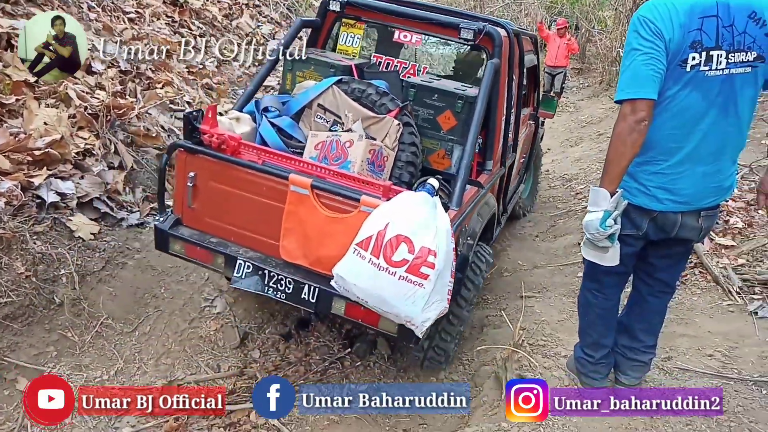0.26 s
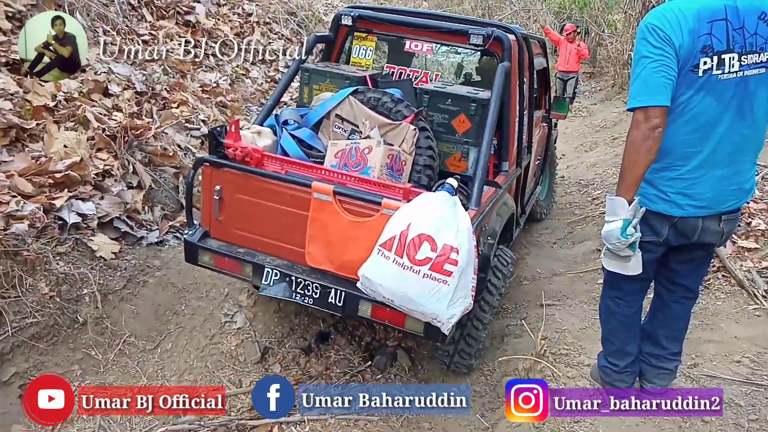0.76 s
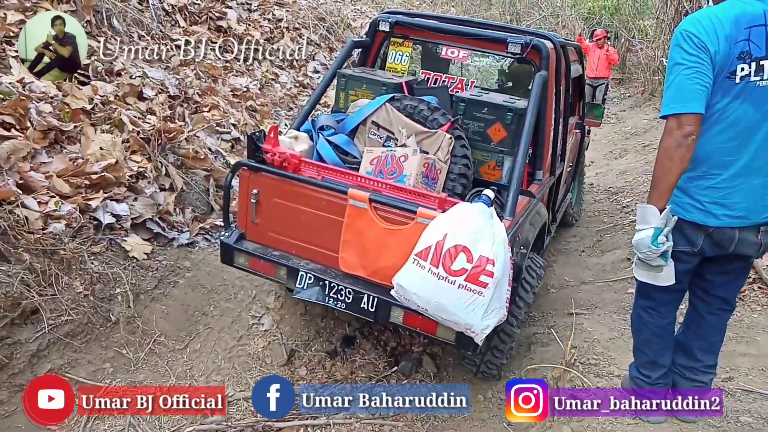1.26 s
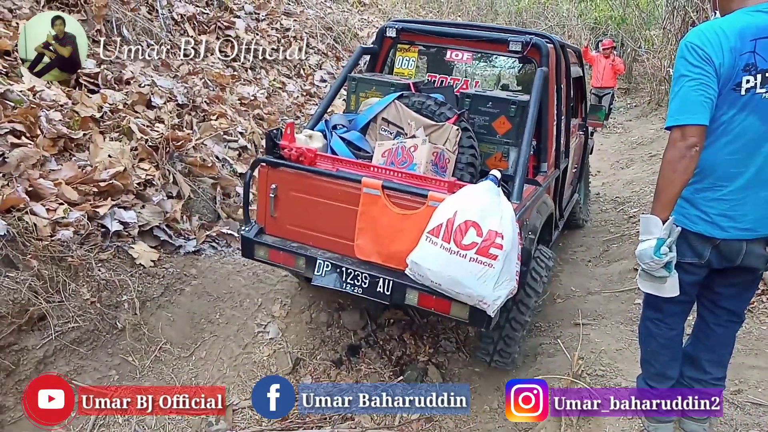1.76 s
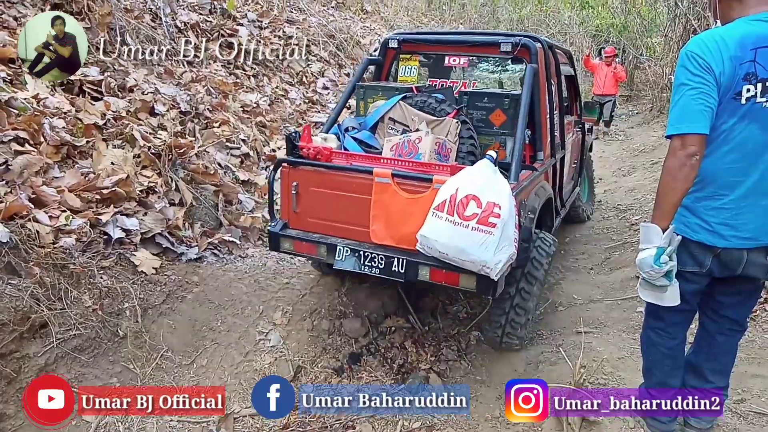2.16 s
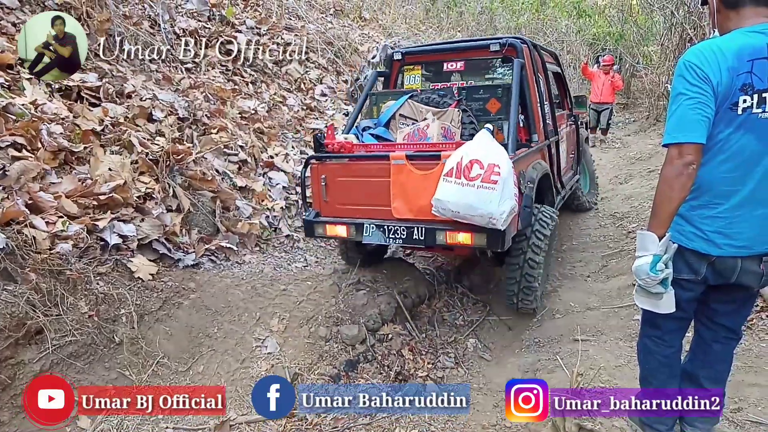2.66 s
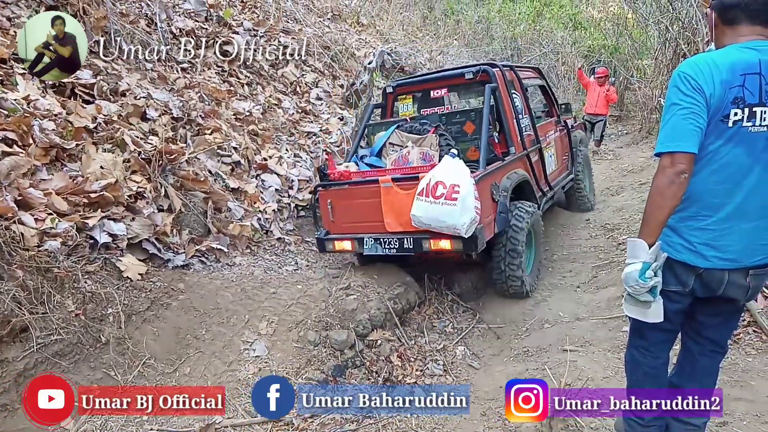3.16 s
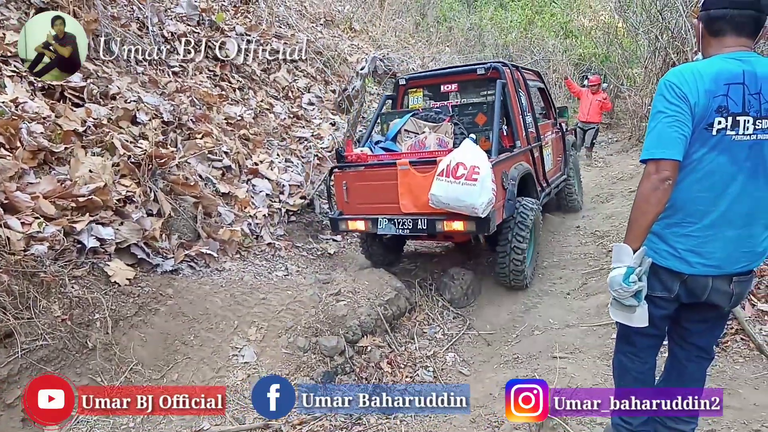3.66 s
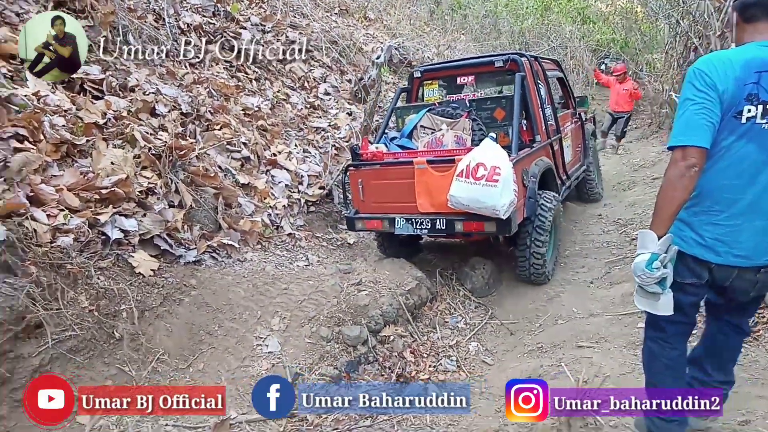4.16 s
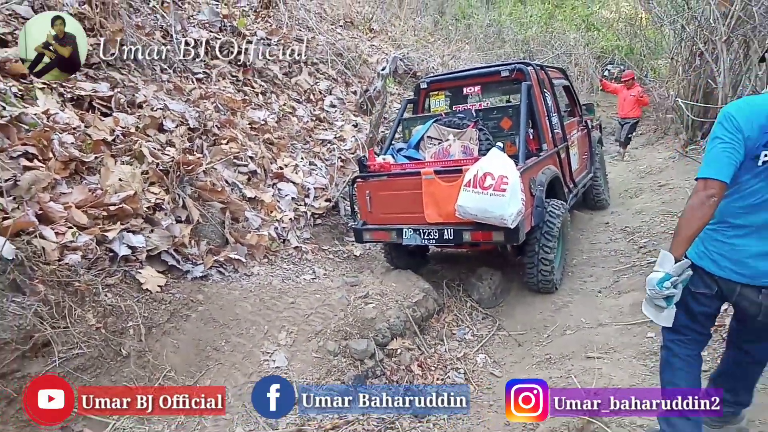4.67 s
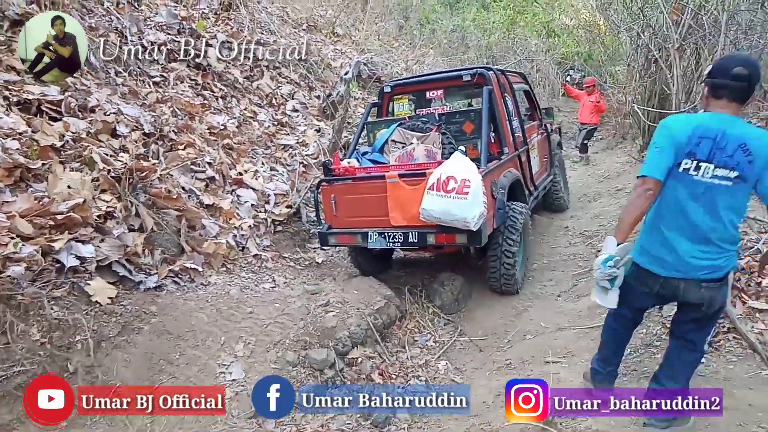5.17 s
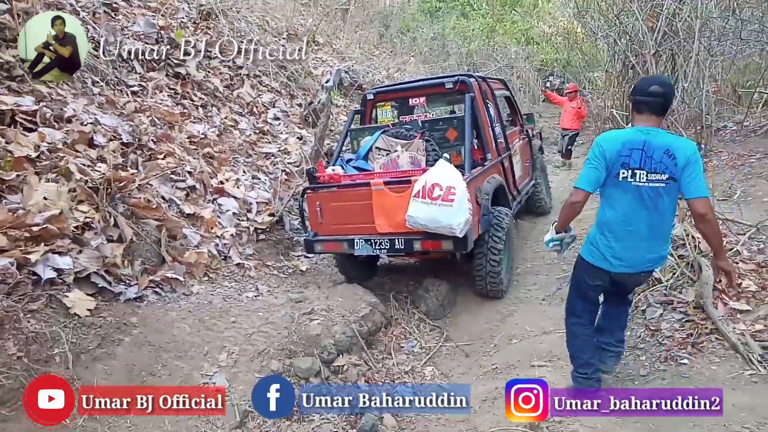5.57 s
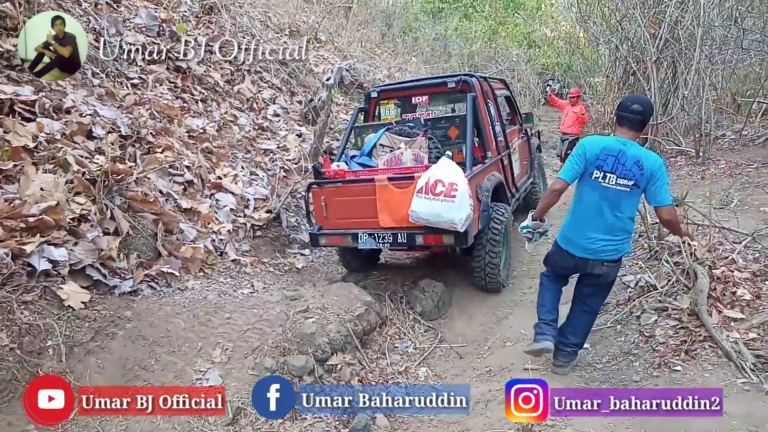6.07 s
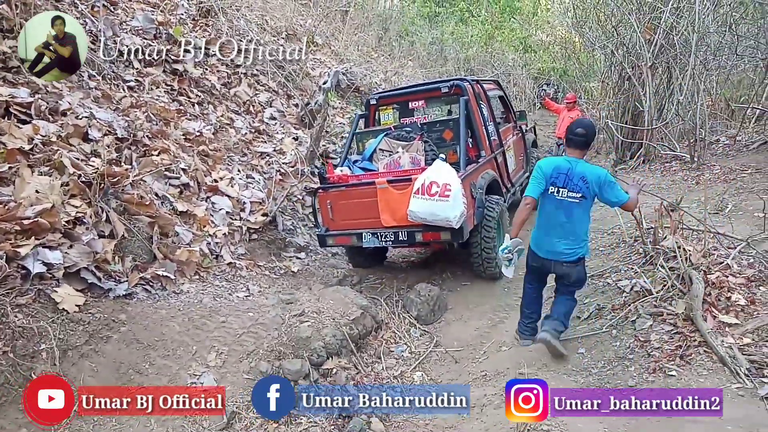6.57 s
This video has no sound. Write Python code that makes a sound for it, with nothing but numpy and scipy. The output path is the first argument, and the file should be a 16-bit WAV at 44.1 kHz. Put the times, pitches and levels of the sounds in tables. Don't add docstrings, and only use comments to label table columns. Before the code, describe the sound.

A small four-cylinder off-road vehicle is heard from behind by a microphone on an open rocky trail, with low unsteady rumble and short dull echoes from ground and bank. It idles lumpily, valves ticking, until about 0.6 s, when the throttle opens: revs peak near 1.0 s with a harsh tailpipe bark and gritty gas hiss, then sag and waver. At 2.0 s the throttle shuts and about fourteen rapid pops boom and crackle until 2.8 s, strongest near the end, as it pulls away. From 3.05 to 3.55 s tyres crunch stones. Uneven, quieter idle continues with low thumps near 3.9 and 4.1 s. Around 4.9 to 5.1 s heavy muffler thumps and bright stone crunches lead into a second surge, higher and smoother, hissing and buzzing through 5.9 s. It eases, revs staying high, and lifts off near 6.7 s with two deep soft thuds.

```python
import sys
import numpy as np
from scipy import signal
from scipy.fft import rfft, irfft, next_fast_len
from scipy.io import wavfile
from scipy.ndimage import uniform_filter1d

SR = 44100
rng = np.random.default_rng(int(sys.argv[2]) if len(sys.argv) > 2 else 0)


def voltage_ratio(decibels):
    exponent = np.asarray(decibels, float) / 20
    return 10 ** exponent


def inscribe(sig):
    pcm = np.round(np.clip(np.atleast_2d(sig).T, -1, 1) * 32767)
    wavfile.write(sys.argv[1], SR, pcm.astype(np.int16))


N = 300881
IDLE_PER_S = 18


def rms_one(x):
    return x / np.sqrt(np.mean(x ** 2) + 1e-20)


def in_time(rows):
    start_s, *columns = np.transpose(rows)
    return [np.interp(np.arange(N) / SR, start_s, column) for column in columns]


def drift(rate_hz):
    r = np.exp(-80 * np.pi * rate_hz / SR)
    noise = rng.standard_normal(N // 40 + 2002)
    slow = signal.lfilter([1], [1, -2 * r, r * r], noise)[2000:]
    return np.interp(np.arange(N) / 40, np.arange(len(slow)), rms_one(slow))


def resonance(x, hz, width):
    r = np.exp(-np.pi * width / SR)
    zeros = np.array([1, 0, -1]) * (1 - r * r) / 2
    poles = [1, -2 * r * np.cos(2 * np.pi * hz / SR), r * r]
    return signal.lfilter(zeros, poles, x + 1e-18)


def steep_resonance(x, hz, width):
    return resonance(resonance(x, hz, width), hz, width)


def modes(x, table, tilt_db=lambda hz: 0):
    out = 0
    for k, (hz, width, db) in enumerate(table):
        out = out + (-1) ** k * voltage_ratio(db + tilt_db(hz)) * resonance(x, hz, width)
    return out


def coloured(x, spectrum):
    hz, db = np.transpose(spectrum)
    size = next_fast_len(N)
    bin_hz = np.arange(size // 2 + 1) * SR / size
    gain = voltage_ratio(np.interp(np.log(bin_hz + 1), np.log(hz), db))
    return rms_one(irfft(rfft(x, size) * gain, size)[:N])


def clicks(times_s, sizes):
    out = np.zeros(N)
    places = (np.asarray(times_s) * SR).astype(int)
    np.add.at(out, np.clip(places, 0, N - 1), sizes)
    return out


def fade(x, t60):
    return signal.lfilter([1], [1, -voltage_ratio(-60 / (t60 * SR))], x + 1e-18)


# start_s, end_s
PULL_AWAY_S = (2.0, 3.5)


def pulled_away():
    return np.interp(np.arange(N) / SR, PULL_AWAY_S, [0, 1])


# share_of_cycle, level_db
CYLINDERS = [(0, -6.5), (0.251, -2), (0.51, -6.5), (0.76, -7)]


def firings(cycles, jitter, spread_db, lumpy=1):
    share, db = np.transpose(CYLINDERS)
    turn = np.arange(int(cycles[-1]) + 1)[:, None] + share
    timing_luck, strength_luck = rng.standard_normal((2,) + turn.shape)
    times_s = np.interp(turn + jitter * timing_luck, cycles, np.arange(N) / SR)
    lumpy = np.broadcast_to(lumpy, N)[(times_s * SR).astype(int)]
    sizes = voltage_ratio(db * lumpy + spread_db * strength_luck)
    return clicks(times_s.ravel(), sizes.ravel())


# pitch_hz, density_db (dB per Hz)
RUMBLE_SPECTRUM = [(12, -38.5), (30, -29.5), (50, -28.5), (70, -4), (124, 3.5), (200, -1.5), (260, -23),
                   (400, -68)]


def rumble():
    return voltage_ratio(-30.5 + 0.73 * drift(7.1)) * coloured(rng.standard_normal(N), RUMBLE_SPECTRUM)


# pitch_hz, density_db (dB per Hz)
CLATTER_SPECTRUM = [(200, -11.5), (377, -9.5), (540, -7), (700, -7.5), (972, -14.5), (1460, -18),
                    (2100, -22.5), (2800, -20.5), (3700, -15.5), (4300, -26), (4900, -38.5), (5500, -45.5),
                    (8300, -50), (9500, -59.5), (16000, -77.5)]
# pitch_hz, width_hz, level_db
FAN_WHISTLES = [(3790, 170, 21.5), (3100, 270, 9), (2550, 160, -22), (3970, 130, -19.5)]


def clatter(cycles, level_db):
    valves = fade(firings(cycles + .11, jitter=0.084, spread_db=5.5), t60=0.026)
    ticks = (valves + 1.5) * rng.standard_normal(N)
    whistle = sum(voltage_ratio(db) * steep_resonance(ticks, hz, width) for hz, width, db in FAN_WHISTLES)
    return voltage_ratio(level_db + 9) * (coloured(ticks, CLATTER_SPECTRUM) + .17 * rms_one(whistle))


# start_s, peak_db, pitch_hz, top_db (treble below the peak)
STONE_CRUNCHES = [(.612, -39, 3480, -14), (3.06, -16, 760, -31), (3.076, -18.5, 290, -53),
                  (3.189, -20.5, 1160, -25), (3.215, -20.5, 1660, -31), (3.229, -20, 2860, -31),
                  (3.239, -17.5, 1160, -43), (3.346, -29, 3080, -46), (3.379, -21, 670, -50),
                  (3.49, -26, 1660, -44), (3.549, -26.5, 2110, -16), (4.869, -30, 3740, -13),
                  (4.899, -33, 3740, -25), (4.926, -32, 3790, -7.5), (4.97, -41, 3680, -20),
                  (5.037, -22.5, 2830, -12), (5.052, -17, 2880, -7.5), (5.066, -45, 2860, -15),
                  (5.093, -24, 3740, -9), (5.327, -20, 1480, -34)]


def stones():
    grit = rng.standard_normal(N)
    out = 0
    for start_s, db, hz, top_db in STONE_CRUNCHES:
        envelope = fade(clicks([start_s], voltage_ratio(db)), t60=0.08)
        burst = signal.lfilter([.02], [1, -.98], envelope) * grit
        body = 2.6 * resonance(resonance(burst, hz, 450), hz, 700)
        scrape = .25 * resonance(steep_resonance(burst, 1900, 2800), 1900, 2800)
        out = out + body + scrape + voltage_ratio(top_db) * steep_resonance(burst, 6500, 3000)
    return out


# start_s, peak_db, pitch_hz
LOW_THUMPS = [
    (3.917, -12.5, 113.3),
    (4.078, -16.5, 107.6),
    (4.867, -16.5, 146),
    (4.924, -8.5, 119),
    (5.039, 0, 135),
    (5.098, -5, 152),
    (6.691, -14, 92),
    (6.771, -15, 70.2),
]


def thumps():
    return sum(steep_resonance(clicks([start_s], voltage_ratio(db + 56)), hz, 21) for start_s, db, hz in LOW_THUMPS)


# start_s, peak_db, crack_db (level of the noisy crack)
POPS = [(2.055, -11, -34.5), (2.115, -11, -32.5), (2.178, -15, -38), (2.236, -9, -32.5), (2.305, -5, -29),
        (2.363, -9.5, -25.5), (2.413, -5, -25), (2.47, -4.5, -20.5), (2.521, -6.5, -27),
        (2.588, -4.5, -23.5), (2.647, -2.5, -25.5), (2.71, -0.5, -23), (2.745, -3.5, -29.5),
        (2.774, -8, -29.5)]
# pitch_hz, width_hz, level_db
POP_MODES = [(437, 206, 2.5), (645, 242, 4), (920, 253, 3), (1350, 335, 1), (1825, 305, -2.5),
             (2860, 1000, -6.5), (3900, 644, -7.5), (4440, 380, -16), (6760, 800, -30.5), (7800, 520, -72)]


def pops():
    start_s, boom_db, crack_db = np.transpose(POPS)
    boom = clicks(start_s - .003, voltage_ratio(boom_db + 50.5))
    for hz, width in ((262, 42), (272, 90), (285, 128)):
        boom = resonance(boom, hz, width)
    crack = clicks(start_s - .007, voltage_ratio(crack_db + 13.5))
    afterburn = 0.31 * fade(crack, t60=0.19) * voltage_ratio(4.9 * drift(60))
    spit = (fade(crack, t60=0.12) + afterburn) * rng.standard_normal(N)
    return boom, modes(spit, POP_MODES)


# pitch_hz, density_db (dB per Hz)
RUSH_SPECTRUM = [(500, -44), (900, 2), (1130, -16), (1750, -12.5), (2150, -29.5), (2600, -35),
                 (3700, -30.5), (4500, -22), (5500, -24), (7200, -27), (8600, -32), (9500, -46.5),
                 (12000, -64.5), (16000, -73.5)]
# pitch_hz, width_hz, near_db, far_db (once the vehicle has pulled away)
PANELS = [(1265, 48, -15, -6), (1570, 88, -8, -18), (1793, 140, 3.5, -2), (2620, 34, -27, -12.5),
          (2615, 98, -2, 3.5), (2922, 150, 1.5, 2.5), (3246, 120, -0.5, -4), (3576, 210, 4.5, 2),
          (3740, 65, -3.5, 1.5), (4516, 130, -7, -17), (4850, 200, -12, -13.5), (5780, 62, -13.5, -18),
          (6420, 110, -12.5, -19.5), (7240, 120, -14, -22), (8170, 210, -22, -23.5)]


def rush(cycles, level_db):
    away = pulled_away()
    bursts = fade(firings(cycles, jitter=0.0049, spread_db=4.0, lumpy=0.17), t60=0.011)
    gas = (bursts + .25) * rng.standard_normal(N)
    sheet = 0
    for hz, width, near_db, far_db in PANELS:
        sheet = sheet + voltage_ratio(near_db + away * (far_db - near_db)) * steep_resonance(gas, hz, width)
    buzz = coloured(gas, RUSH_SPECTRUM) + .9 * rms_one(sheet)
    spikes = fade(firings(cycles, jitter=0.011, spread_db=3.5), t60=.004) * rng.standard_normal(N)
    edge_db = -41 + 4 * away + .5 * (level_db + 52)
    edge = voltage_ratio(edge_db) * rms_one(resonance(spikes + .3 * gas, 11000, 6000))
    return voltage_ratio(level_db + 17.5) * (rms_one(buzz) + edge)


# pitch_hz, level_db
SILENCER = [(70, -39.5), (82, -27.5), (98, -19), (122, -17.5), (142, -16.5), (163, -33.5), (193, -20.5),
            (222, -32)]
# order, level_db, follows (share of firing strength)
STRONG_ORDERS = [(4, 1.85, 0.85), (5, -10.5, 0.81), (7, -10, -0.48), (8, -8.5, 1.47), (9, -11.5, 1.42)]
# order, level_db, open_db (gain at full throttle)
UNEVEN_ORDERS = [(3, -19, -1.5), (6, -24, 2.5), (10, -5.5, 3), (11, -3, -2.5), (12, -14, 14.5),
                 (13, -13.5, 7.5)]
# pitch_hz, width_hz, level_db
MUFFLER = [(135, 49, -3.5), (201, 18, 1.5), (290, 7.1, 0)]


def hum(per_s, cycles, opening, fire_db):
    turn = 2 * np.pi * cycles
    pass_hz, pass_db = np.transpose(SILENCER)
    out = np.zeros(N)
    for order, db, follows in STRONG_ORDERS:
        passed_db = np.interp(np.log(order * per_s), np.log(pass_hz), pass_db)
        wander_db = 1.6 * (1.2 - opening) * drift(4)
        strength_db = follows * np.maximum(fire_db, 0) + np.minimum(fire_db, 0)
        tone = np.sin(order * turn + 0.49 * (order % 4) ** 2)
        out -= voltage_ratio(db + passed_db + strength_db + wander_db) * tone
    uneven_db = -31.5 + fire_db - 2.5 * (per_s - IDLE_PER_S)
    for order, db, open_db in UNEVEN_ORDERS:
        chamber = 0
        for hz, width, gain_db in MUFFLER:
            chamber = chamber + voltage_ratio(gain_db) / np.sqrt(1 + (2 * (order * per_s - hz) / width) ** 2)
        level = voltage_ratio(uneven_db + db + open_db * opening + 4.2 * drift(1.3))
        out -= chamber * level * np.sin(order * turn + 0.27 * order ** 2)
    return np.sqrt(2) * out


def throb(per_s, cycles, level_db, note_hz, bright_db):
    swell_s, rise_hz_per_s = 0.012, 2500
    turn = cycles - 0.0486 + 1
    which, since_s = turn.astype(int), (turn % 1) / per_s
    level_luck, note_luck = rng.standard_normal((which[-1] + 1, 2))[which].T
    swell = (since_s / swell_s) ** 2 * np.exp(2 - 2 * since_s / swell_s)
    hz = note_hz * (1 + .014 * note_luck) + rise_hz_per_s * (since_s / 2 - swell_s)
    phase = 2 * np.pi * hz * since_s
    upper = voltage_ratio(-12.5 + 1.4 * bright_db) * np.sin(1.19 * phase)
    return voltage_ratio(level_db + 2.2 * level_luck) * rms_one(swell) * np.sqrt(2) * (np.sin(phase) + upper)


# pitch_hz, width_hz, level_db
TAILPIPE = [(380.3, 26, -4), (523.6, 14, -13.5), (575, 57, -7), (654.7, 30.4, 1), (740, 19, -4),
            (930, 50, -34.5), (948, 24, -7), (1074, 15, -13), (1210, 36, -35)]
# order, level_db (below the bark)
OVERTONES = [(16, -1.5), (20, -7), (24, -8.5), (25, -16.5), (27, -11.5), (28, -5), (32, -10.5), (36, -10.5),
             (39, -8), (40, -11), (44, -16.5), (50, -19)]
# pitch_hz, width_hz, shut_db (throttle shut), open_db
PIPE_PEAKS = [(490.6, 35, 2.5, 9.5), (349, 50, 9.5, 1.5)]


def overtones(per_s, cycles, opening):
    out = 0
    for order, db in OVERTONES:
        swell_db = 0
        for peak_hz, width, shut_db, open_db in PIPE_PEAKS:
            nearness = 1 / (1 + (2 * (order * per_s - peak_hz) / width) ** 2)
            swell_db = swell_db + (shut_db + opening * (open_db - shut_db)) * nearness
        out = out + voltage_ratio(db + 1.5 * drift(2) + swell_db) * np.sin(2 * np.pi * order * cycles)
    return out


def bark(per_s, cycles, opening, level_db, even_db, bright_db):
    lumpy = np.clip((25.5 - per_s) / 3.2, .2, 1.2)
    fire = firings(cycles, jitter=.0004, spread_db=.8, lumpy=lumpy)
    turbulence = fade(fire, t60=0.058) * rng.standard_normal(N)
    ring = modes(fire + .012 * turbulence, TAILPIPE, lambda hz: bright_db * np.tanh(np.log2(hz / 700) / 0.21))
    pipe = rms_one(ring) + voltage_ratio(even_db) * overtones(per_s, cycles, opening)
    pipe = pipe - resonance(pipe, 314, 55)
    band = signal.butter(3, [345, 1280], "band", fs=SR, output="sos")
    return voltage_ratio(level_db) * signal.sosfilt(band, pipe)


def hillside(x):
    dull = signal.lfilter([.3], [1, -.7], x)
    out = x
    for delay_s, db in ((.011, -12), (.027, -14)):
        out = out + voltage_ratio(db) * np.pad(dull, (int(delay_s * SR), 0))[:N]
    return out


def through_air(snaps):
    dulled = signal.sosfilt(signal.butter(6, 8600, fs=SR, output="sos"), snaps)
    return voltage_ratio(-25.5) * np.diff(snaps, prepend=0) + dulled


# start_s, cycles_per_s (four-stroke cycles)
SPEED = [(.56, 17.5), (.68, 19.7), (1.0, 23.1), (1.13, 22.4), (1.35, 20.6), (1.71, 19.8), (2.0, 21.1),
         (2.3, 18.9), (2.75, 17.4), (3.5, 18.3), (4.6, 18.8), (5.1, 19.0), (5.45, 23.7), (5.7, 24.8),
         (5.95, 24.7), (6.19, 23.5), (6.55, 24.8), (6.82, 23.7)]
# start_s, opening (0-1), fire_db (firing strength above idle), note_hz (tailpipe)
THROTTLE = [(0, 0, 2.5, 726), (.57, 0.1, -4.5, 697), (.62, 0.99, 5, 669), (.87, 0.98, 11, 658),
            (1.2, 0.63, 6.5, 645), (1.42, 0.71, 6, 743), (1.66, 0.71, 2.5, 683), (1.93, 0.86, 7, 756),
            (2.04, 0.01, -5.5, 700), (2.33, 0.22, -0.4, 700), (4.82, 0.08, -1.3, 680), (4.93, 0.2, 6, 664),
            (5.02, 0, 4, 693), (5.06, 0.7, 7, 669), (5.3, 0.94, 9, 653), (5.94, 0.87, 9.5, 697),
            (6.18, 0.34, 2.5, 667), (6.7, 0.02, -1, 664)]


def scene():
    per_s = uniform_filter1d(in_time(SPEED)[0], size=3000)
    cycles = np.cumsum(per_s) / SR + .3
    opening, fire_db, note_hz = in_time(THROTTLE)
    bright_db = .05 * (note_hz - 700)
    away = pulled_away()
    above_idle = per_s - IDLE_PER_S

    bark_db = -34 + 0.63 * fire_db + 8 * opening - 10 * away + 0.47 * (1 - opening) * above_idle
    even_db = -6.5 * opening + 2.35 * away * opening * above_idle
    throb_db = bark_db - 2.5 + 4.5 * away * (1 - opening) + 1.5 * opening

    boom, crack = pops()
    sharp = through_air(crack + stones())
    sharp = sharp + clatter(cycles, level_db=-46 + 5.5 * opening - away)
    sharp = sharp + rush(cycles, level_db=-73.5 + 25.5 * opening)
    sharp = sharp + throb(per_s, cycles, throb_db, note_hz, bright_db)
    sharp = sharp + bark(per_s, cycles, opening, bark_db, even_db, bright_db)
    low = rumble() + thumps() + boom + hum(per_s, cycles, opening, fire_db)
    return (low + hillside(sharp))[None]


def roll_off(x):
    return signal.sosfilt(signal.butter(12, 15600, fs=SR, output="sos"), x)


def record(dry):
    bent = signal.lfilter([1, -1], [1, -.9985], dry + 0.037 * dry ** 2)
    return roll_off(1.518 * np.tanh(bent / 1.586))


dry = scene()
out = record(dry)
inscribe(out)
```